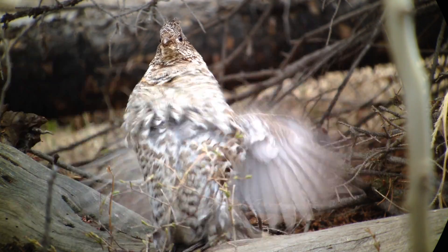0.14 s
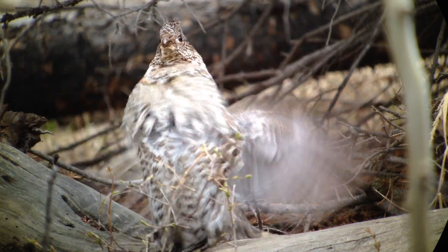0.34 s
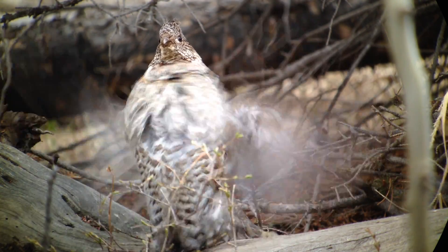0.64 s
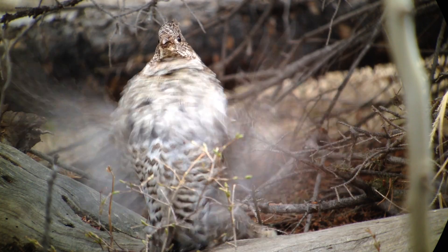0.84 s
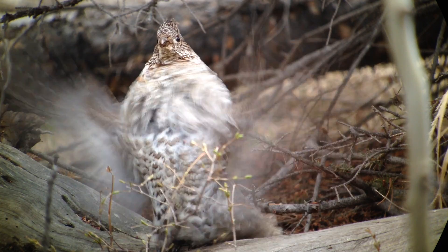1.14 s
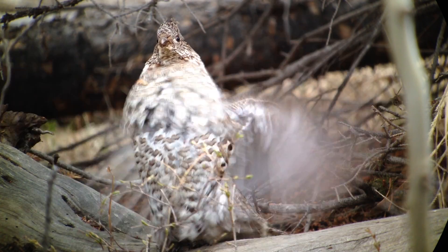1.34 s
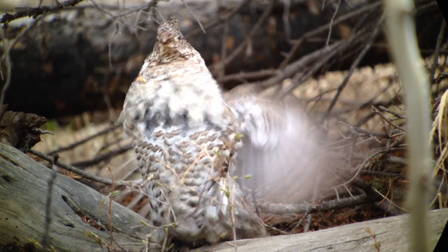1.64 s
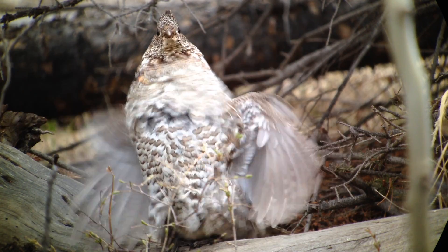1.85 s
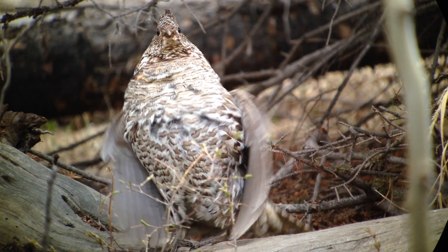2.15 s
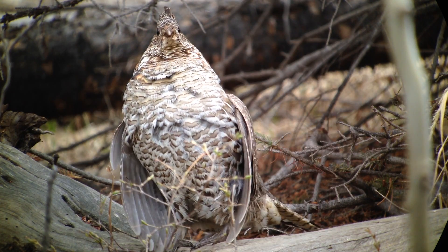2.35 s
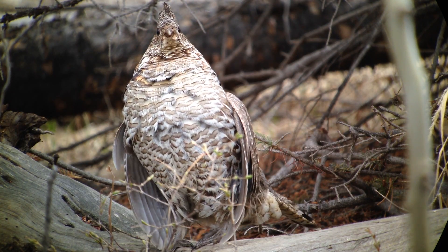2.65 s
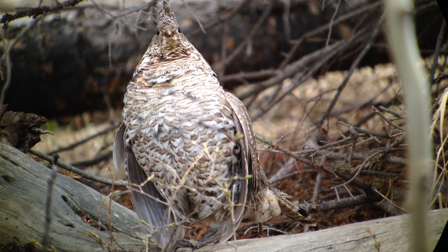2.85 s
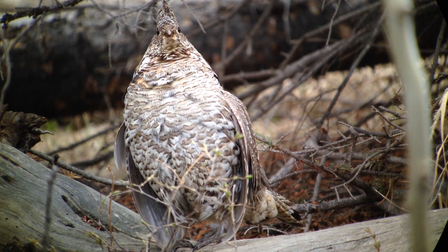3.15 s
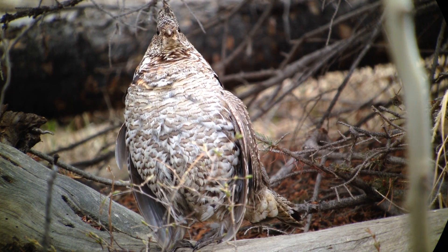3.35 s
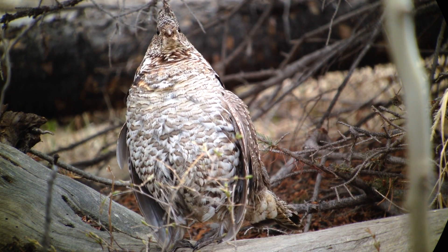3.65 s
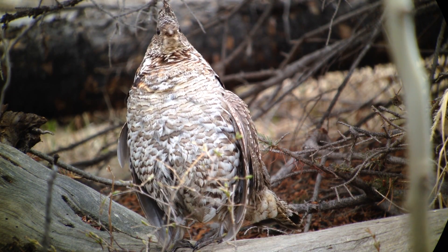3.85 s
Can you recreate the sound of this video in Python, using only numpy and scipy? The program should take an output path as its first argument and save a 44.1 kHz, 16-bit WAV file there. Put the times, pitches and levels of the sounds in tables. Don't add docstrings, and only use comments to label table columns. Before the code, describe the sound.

Deep wingbeat thumps of a grouse quicken, slow and stop in a quiet wood.

```python
import sys
import numpy as np
from scipy import signal
from scipy.io import wavfile
from scipy.ndimage import uniform_filter1d

SR = 44100
rng = np.random.default_rng(int(sys.argv[2]) if len(sys.argv) > 2 else 0)


def file_out(sig):
    cols = np.atleast_2d(sig).T
    lim = np.clip(cols, -1, 1)
    pcm = np.round(lim * 32767).astype(np.int16)
    wavfile.write(sys.argv[1], SR, pcm)


def magnitude_from_level(level_db):
    exponent = np.asarray(level_db, float) / 20
    return 10 ** exponent


N = 176400

# frequency_hz, density_db
HUSH_SPECTRUM = [(53, -38), (90, -9.5), (151, -3.5), (282, -3.5), (502, -2), (758, -10), (1350, -17),
                 (1500, -19.5), (1950, -40), (3300, -120)]
# frequency_hz, density_db
HISS_SPECTRUM = [(880, -44), (1500, -4), (1860, -3), (3040, -1), (4710, 0.5), (14100, -3.5), (15200, -2)]
# time_s, level_db
GUST_STRENGTH = [
    (2.2, -81.5),
    (2.544, -79),
    (2.596, -91),
    (2.906, -80),
    (2.966, -96),
    (3.182, -80),
    (3.402, -88),
    (3.928, -82),
    (4.0, -96),
]
# start_s, length_s, level_db, held_pitch_hz, upward_slide_hz
CHIRPS = [
    (.395, .039, -59.5, 3870, 900),
    (2.231, .049, -61, 3740, 800),
    (3.395, .039, -65.5, 3780, 100),
    (2.224, .055, -67, 6300, 2900),
    (2.276, .012, -69, 4350, 1100),
    (.382, .026, -67, 5000, 1100),
    (3.399, .016, -69, 6050, 300),
]
TRUNK_ECHO_DB = [-12, -9, -7, -8, -4, -1, -6]
HILLSIDE_DB = [-11, -10, -2, -14, -14, -7, -14]
SAG_HZ_PER_S = [0, 2000, 300, 0, 0, 0, 0]
WOBBLE_HZ = [25, 35, 35, 40, 80, 300, 40]
SWELL_POWER = [.5, 1.0, .8, 0, 0, 0, 0]
END_DROP_HZ = [100, 500, 1100, 100, 0, 0, 0]
# start_s, clap_db, pitch_hz, suction_db (against the clap)
BEATS = [(0.09, -29.6, 75.3, -2.0), (0.2101, -29.6, 76.1, -1.5), (0.3198, -29.8, 73.4, -2.9),
         (0.421, -30.7, 72.7, -2.3), (0.5135, -31.1, 74.5, -3.0), (0.5993, -32.4, 72.0, -2.0),
         (0.6772, -31.1, 74.4, -1.7), (0.7491, -31.3, 73.2, -2.4), (0.8141, -31.1, 76.3, -7.0),
         (0.8733, -29.4, 72.7, -7.7), (0.9258, -32.3, 72.5, -5.6), (0.9723, -32.7, 71.6, -0.4),
         (1.0222, -33.3, 68.3, -2.0), (1.0803, -29.9, 74.8, -6.8), (1.1415, -31.2, 74.1, -5.8),
         (1.2061, -32.1, 71.8, -5.0), (1.2766, -32.1, 72.2, -3.4), (1.3509, -32.4, 68.6, -1.9),
         (1.431, -32.9, 71.2, -1.4), (1.5173, -32.0, 69.7, -2.8), (1.6107, -31.2, 71.2, -2.8),
         (1.7109, -32.1, 70.7, -2.5), (1.8181, -32.3, 72.3, -2.3), (1.9334, -31.5, 73.2, -2.4),
         (2.0587, -31.9, 71.6, -2.6)]

SLIDE_S, CHIRP_FALL_S, UPPER_FADE_DB = 0.0065, 0.0025, -11
WINDUP_S, WINDUP_WIDE_S, WINDUP_DB = -0.0046, 0.0034, -11.1
SUCK_S, SUCK_WIDE_S, SUCK_SPREAD = -0.0002, 0.00123, 1.19
CLAP_START_S, CLAP_RISE_S, CLAP_DECAY_S = 0.00285, 0.00326, 0.008
WAKE_HZ, WAKE_WIDTH_HZ, WAKE_DB, WAKE_RISE_S, WAKE_FALL_S = 87.4, 110, -26.5, 0.014, 0.025
WAKE_DB_PER_RATE, SLOW_RATE = 0.22, 9.8
CALM_S = 0.0041
EARLY_WAKE_DB = -62
FLUTTER_HZ, FLUTTER_WIDTH_HZ, FLUTTER_DB = 170.7, 38, -45.5
FLUTTER_DB_PER_RATE, FLUTTER_S = 2, 0.0067
SWISH_LO_HZ, SWISH_HI_HZ, SWISH_DB, SWISH_S, SWISH_WIDE_S = 1440, 4800, -38, 0.003, 0.0055
BOOM_DB, BOOM_T60_S = -22.5, 0.5


def evened(x):
    return x / np.sqrt(np.mean(x ** 2) + 1e-20)


def add(mix, start_s, sound):
    part = mix[max(round(start_s * SR), 0):][:len(sound)]
    part += sound[:len(part)]


def bump(t, at, wide):
    return np.exp(-0.5 * ((t - at) / wide) ** 2)


def resonant_noise(hz, width_hz):
    radius = np.exp(-np.pi * width_hz / SR)
    poles = [1, -2 * radius * np.cos(2 * np.pi * hz / SR), radius ** 2]
    once = signal.lfilter([1, -1], poles, rng.standard_normal(N))
    return evened(signal.lfilter([1, -1], poles, once))


def coloured_air(spectrum, patchy_db, swell_db):
    frames, hz = N // 512 + 5, np.fft.rfftfreq(2048, 1 / SR)
    real, imaginary, patches = rng.standard_normal((frames, 1025, 3)).T
    patches = uniform_filter1d(patches, size=14, axis=0)
    patches = evened(uniform_filter1d(patches, size=8, axis=1))
    swell = evened(uniform_filter1d(rng.standard_normal(frames), size=30))
    f, db = np.transpose(spectrum)
    colour_db = np.interp(np.log(hz + 1), np.log(f + 1), db, left=-99, right=-99)
    level_db = colour_db[:, None] + patchy_db * patches + swell_db * swell
    bins = (real + 1j * imaginary) * magnitude_from_level(level_db)
    return evened(signal.istft(bins, nperseg=2048, noverlap=1536)[1][:N])


def hiss():
    return magnitude_from_level(-66) * coloured_air(HISS_SPECTRUM, 0.74, 0.054)


def hush():
    return magnitude_from_level(-68) * coloured_air(HUSH_SPECTRUM, 1.27, 0.76)


def gusts():
    lumps = uniform_filter1d(rng.standard_normal(N), size=3000)
    lumps = evened(uniform_filter1d(lumps, size=3000))
    strength_db = np.interp(np.arange(N) / SR, *np.transpose(GUST_STRENGTH))
    rushing = magnitude_from_level(-73) * resonant_noise(522, 187)
    return magnitude_from_level(2 + strength_db + 2.5 * lumps) * resonant_noise(55, 70) + rushing


def trunk_echo(x, t60_s, share):
    t = np.arange(SR) / SR
    present = (rng.random(SR) < share) * (t > 0.01)
    taps = rng.standard_normal(SR) * present * magnitude_from_level(-60 * t / t60_s)
    return signal.fftconvolve(x, taps / np.linalg.norm(taps))[:N]


def hillside(x):
    t = np.arange(SR // 4) / SR
    taps = rng.standard_normal(len(t)) * (rng.random(len(t)) < 0.01) * bump(t, 0.07, 0.028)
    return signal.fftconvolve(x, taps / np.linalg.norm(taps))


def birds():
    out = np.zeros(N)
    for k, (start_s, length_s, level_db, hz, slide_hz) in enumerate(CHIRPS):
        t = np.arange(0, length_s, 1 / SR)
        wobble = evened(uniform_filter1d(rng.standard_normal(SR), size=80))[:len(t)]
        pitch = hz - slide_hz * np.exp(-t / SLIDE_S) - SAG_HZ_PER_S[k] * t
        pitch += WOBBLE_HZ[k] * wobble
        pitch -= END_DROP_HZ[k] * np.exp((t - length_s) / CHIRP_FALL_S)
        if SWELL_POWER[k]:
            shape = (t / length_s) ** SWELL_POWER[k]
        else:
            shape = np.minimum(t / CHIRP_FALL_S, 1) * magnitude_from_level(UPPER_FADE_DB * t / length_s)
        shape = shape * np.clip((length_s - t) / CHIRP_FALL_S, 0, 1)
        tone = np.sin(2 * np.pi * np.cumsum(pitch) / SR)
        note = np.sqrt(2) * magnitude_from_level(level_db) * shape * tone
        add(out, start_s, note)
        add(out, start_s, magnitude_from_level(TRUNK_ECHO_DB[k]) * trunk_echo(note, 0.4, 0.036))
        add(out, start_s, magnitude_from_level(HILLSIDE_DB[k]) * hillside(note))
    return out


def thump(t, hz, suck_db):
    u = t - CLAP_START_S
    onset = (1 + np.tanh(u / CLAP_RISE_S)) / 2
    clap = np.sin(2 * np.pi * hz * u) * bump(t, 0, CLAP_DECAY_S) * onset
    push = magnitude_from_level(WINDUP_DB) * bump(t, WINDUP_S, WINDUP_WIDE_S)
    dip = magnitude_from_level(suck_db) * bump(t, SUCK_S, SUCK_WIDE_S * magnitude_from_level(-SUCK_SPREAD * suck_db))
    return clap + push - dip


def wings():
    thumps, wake, swish, flutter = np.zeros((4, N))
    lead = 0.05
    t = np.arange(-lead, 0.2, 1 / SR)
    times = np.array([row[0] for row in BEATS])
    for (start_s, clap_db, hz, suck_db), rate in zip(BEATS, 1 / np.gradient(times)):
        at, haste = start_s - lead, rate - SLOW_RATE
        add(thumps, at, magnitude_from_level(clap_db) * thump(t, hz, suck_db))
        stir = np.where(t < 0, bump(t, 0, WAKE_RISE_S), np.exp(-t / WAKE_FALL_S))
        stir = stir * (1 - 0.39 * bump(t, CLAP_START_S, CALM_S))
        add(wake, at, magnitude_from_level(clap_db + WAKE_DB + WAKE_DB_PER_RATE * haste) * stir)
        add(swish, at, magnitude_from_level(clap_db + SWISH_DB) * bump(t, SWISH_S, SWISH_WIDE_S))
        flutter_db = clap_db + FLUTTER_DB + FLUTTER_DB_PER_RATE * haste
        add(flutter, at, magnitude_from_level(flutter_db) * bump(t, 0, FLUTTER_S))
    add(wake, 0, magnitude_from_level(EARLY_WAKE_DB) * np.exp(-(t + lead) / WAKE_FALL_S))
    eddies = wake * resonant_noise(WAKE_HZ, WAKE_WIDTH_HZ)
    eddies += flutter * resonant_noise(FLUTTER_HZ, FLUTTER_WIDTH_HZ)
    boom = magnitude_from_level(BOOM_DB) * trunk_echo(thumps, BOOM_T60_S, 0.36)
    band = signal.butter(2, [SWISH_LO_HZ, SWISH_HI_HZ], "bandpass", fs=SR, output="sos")
    feathers = swish * evened(signal.sosfilt(band, rng.standard_normal(N)))
    return thumps + boom + eddies + feathers


def scene():
    return (hush() + gusts() + birds() + wings())[None]


def low_pass(x):
    return signal.sosfilt(signal.butter(12, 15390, fs=SR, output="sos"), x)


def record(dry):
    low_cut = signal.butter(2, 25, "highpass", fs=SR, output="sos")
    mix = signal.sosfilt(low_cut, dry + hiss())
    return low_pass(mix)


dry = scene()
out = record(dry)
file_out(out)
```